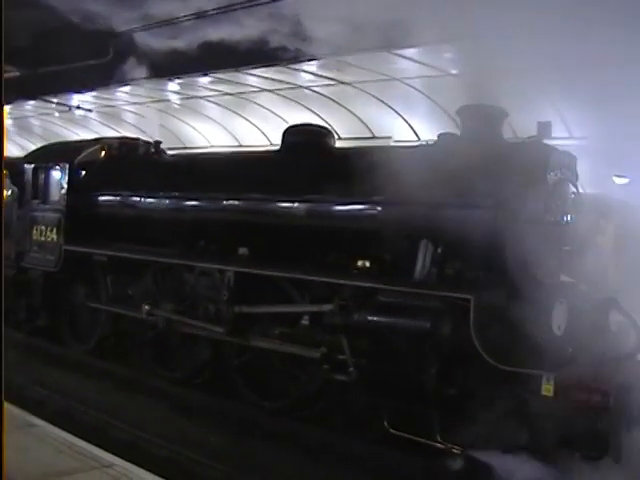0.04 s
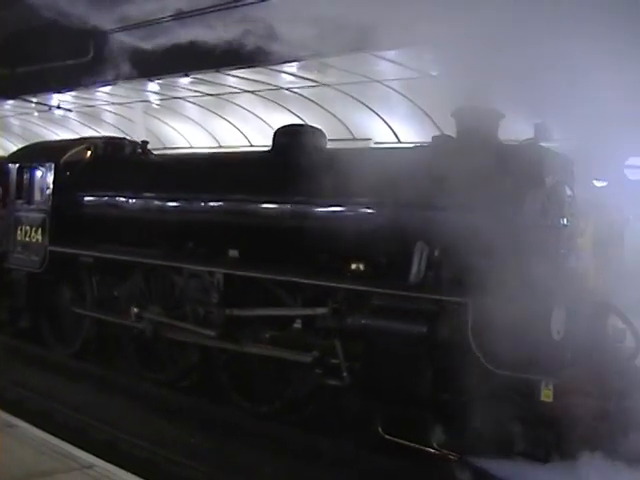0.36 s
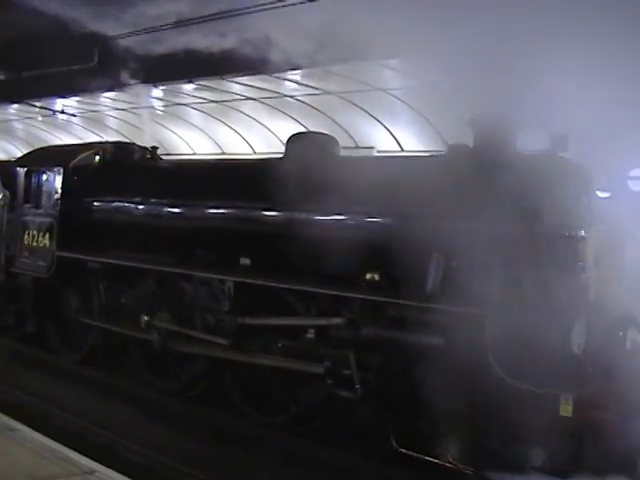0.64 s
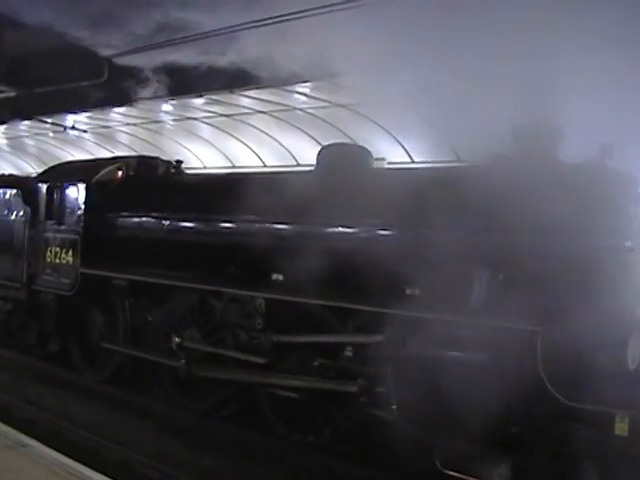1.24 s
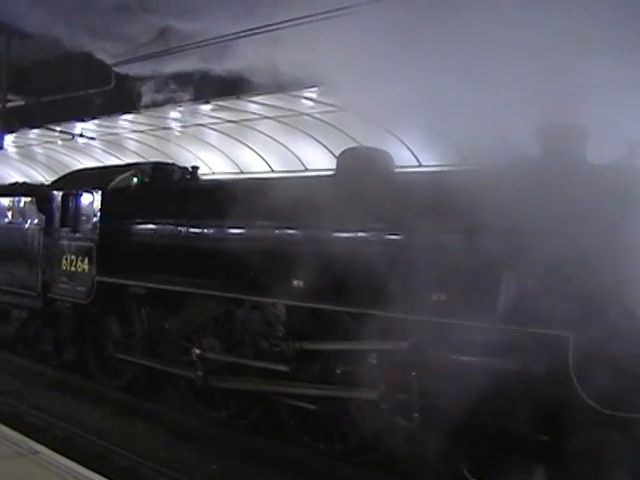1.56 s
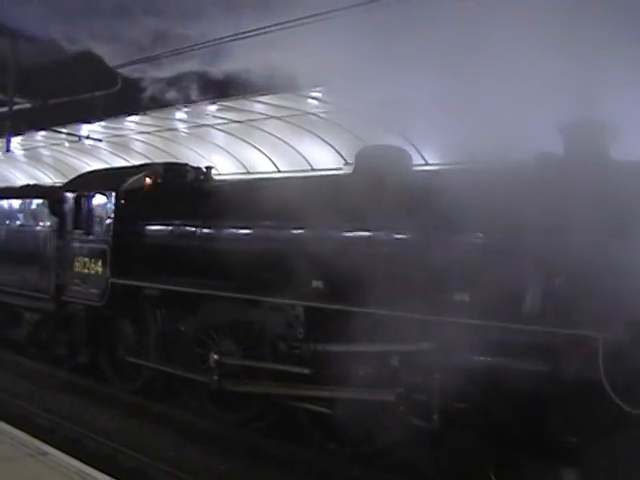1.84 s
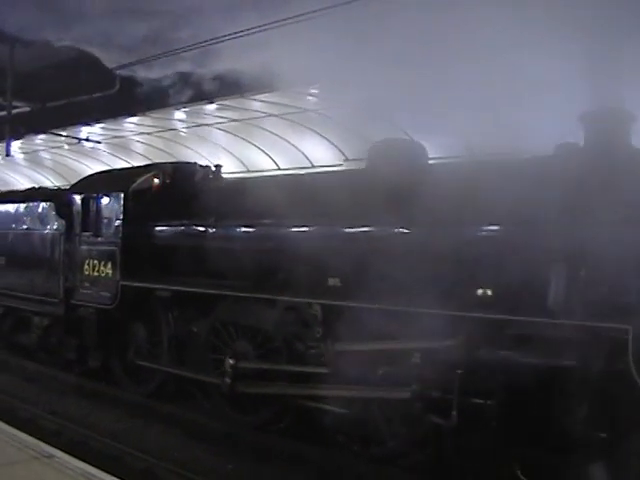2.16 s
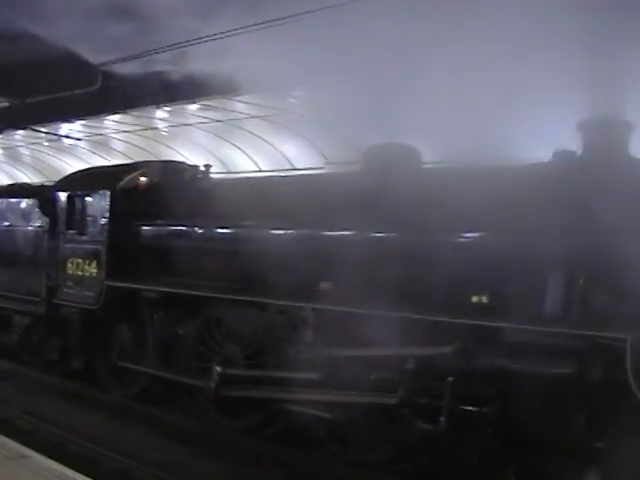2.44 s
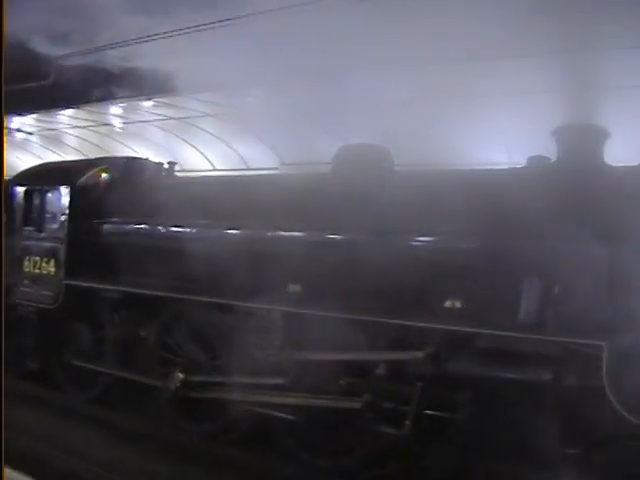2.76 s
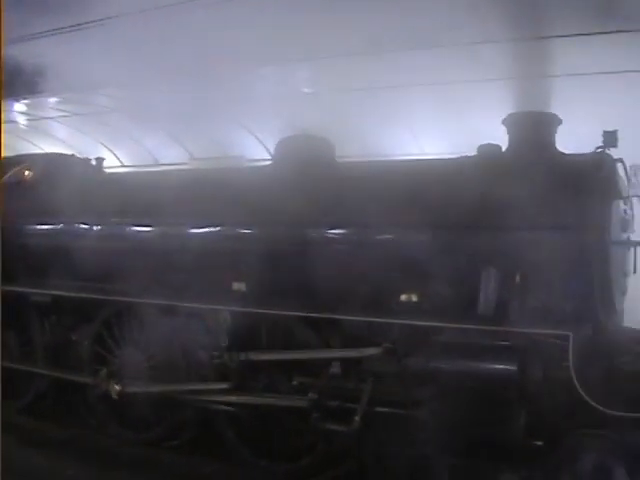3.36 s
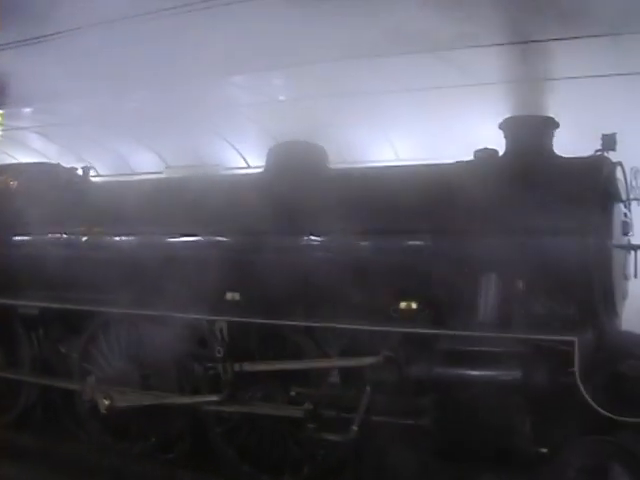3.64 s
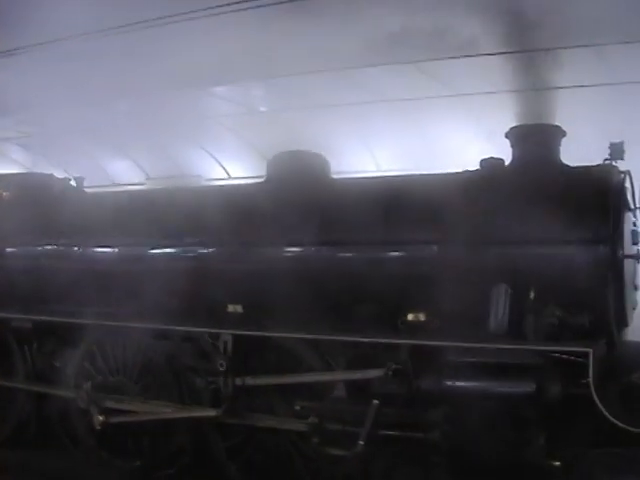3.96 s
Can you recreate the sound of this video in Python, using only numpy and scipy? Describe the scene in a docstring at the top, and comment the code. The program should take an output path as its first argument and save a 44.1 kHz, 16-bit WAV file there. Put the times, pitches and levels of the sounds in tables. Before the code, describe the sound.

Loud hiss of steam jetting from a locomotive, easing to a hollow rush near the end.

```python
"""A steam locomotive creeps past under a station roof, blowing off steam with a hollow rush.
Almost at once its cylinder drain cocks snap open and throw a fierce hiss with two shrill bands.
The hiss overloads the microphones, whose lopsided clipping adds a rough, tearing roar.
Just before 3 s the cocks shut and the jet dies away; the blow-off carries on, with brief hollow rings."""
import sys
import numpy as np
from scipy import signal
from scipy.fft import rfft, irfft
from scipy.io import wavfile
from scipy.ndimage import uniform_filter1d, map_coordinates

SR = 44100
rng = np.random.default_rng(int(sys.argv[2]) if len(sys.argv) > 2 else 0)


def dump(signal):
    """Clip the signal to [-1, 1] and save it as 16-bit WAV at the path in sys.argv[1]."""
    limited = np.clip(np.atleast_2d(signal).T, -1, 1)
    pcm = np.round(limited * 32767).astype(np.int16)
    wavfile.write(sys.argv[1], SR, pcm)


N = 176400


def amp(db):
    """Decibels to gain."""
    return 10 ** (np.asarray(db) / 20)


def at_hz(rows, hz):
    """(Hz, value) rows interpolated on a log frequency axis."""
    row_hz, values = np.transpose(rows)
    return np.interp(np.log(hz + 1), np.log(row_hz + 1), values)


def at_times(rows, time_s):
    """Each column after the first, interpolated at time_s."""
    row_s, *columns = np.transpose(rows)
    return [np.interp(time_s, row_s, column) for column in columns]


def wobble(rate_hz):
    """Smooth random curve, rate_hz knots a second."""
    return map_coordinates(rng.standard_normal(400), [np.arange(N) * rate_hz / SR], mode="wrap")


def bell(x, centre, width):
    """Gaussian of height 1."""
    return np.exp(-.5 * ((x - centre) / width) ** 2)


def turbulence(patchy_db):
    """Two independent noises with drifting patches of level, as short-time spectra."""
    hz, frame_s, spectra = signal.stft(rng.standard_normal((2, N)), SR, nperseg=1024)
    patches = uniform_filter1d(rng.standard_normal(spectra.shape[1:]), size=8, axis=0)
    patches = uniform_filter1d(patches, size=12, axis=1)
    return hz[:, None], frame_s, spectra * amp(patchy_db * patches / patches.std())


# Each row: frequency in Hz, base lag of the left microphone in radians.
LEFT_LAG = [(100, 0.33), (2900, 0), (4200, 0.49), (6300, 0.48), (8300, 0.84), (15000, 1.1)]
# Direction of the steam. Each row: time in seconds, stereo spread factor, factor on LEFT_LAG.
DIRECTION = [(0, 0.32, .5), (.3, 0.44, .45), (.57, 0.7, .55), (.63, 1, .7), (.7, 0.74, .6),
             (1.2, 1.06, .85), (1.9, 1.3, 1.3), (2.6, 1.34, 1.35), (2.9, 0.94, 1.25), (3.18, 1.05, 1.5),
             (3.28, 0.73, 1.2), (3.7, 0.71, 1.05), (4, 0.36, .65)]


def at_microphones(spectra, hz, frame_s, likeness):
    """Stereo pair of rms 1: partly alike, the left late, both set by the steam's direction."""
    spread, lag_factor = at_times(DIRECTION, frame_s)
    spread_rad = spread * np.arccos(np.clip(at_hz(likeness, hz), 0, 1)) / 2
    mid, side = spectra[0] * np.cos(spread_rad), spectra[1] * np.sin(spread_rad)
    half_lag = np.exp(.5j * lag_factor * at_hz(LEFT_LAG, hz))
    left, right = (mid + side) / half_lag, (mid - side) * half_lag
    pair = signal.istft(np.array([left, right]))[1][:, :N]
    return pair / pair.std()


# Each row: time in seconds, level in dB.
BLOW_OFF_LEVEL = [(0, -9), (.5, -5.5), (1.5, -8), (2.3, -6.6), (2.85, -6), (3.05, -7.5), (3.22, -7),
                  (3.33, -7.5), (3.5, -8.5), (3.8, -8.5), (3.91, -10), (4, -10.5)]
# Each row: frequency in Hz, relative spectral density in dB.
BLOW_OFF_SPECTRUM = [(30, -19), (130, -22), (380, -21.5), (560, -7), (1000, -3.5), (2000, -3), (2700, 0),
                     (4500, -0.9), (6800, -0.6), (8500, -4.5), (11000, -13.5), (16000, -28)]
# Each row: centre in Hz, width in Hz, lift in dB.
PIPE_RESONANCES = [(1070, 41, 3.5), (1215, 74, 2.5), (1570, 270, 2), (2680, 260, 2), (3570, 97, 1.5)]
# Each row: peak time in seconds, half length in seconds, centre in Hz, width in Hz, lift in dB.
HOLLOW_RINGS = [(.02, .06, 1260, 40, 10), (.15, .15, 1730, 110, 4), (2.3, 0.34, 1650, 60, 6),
                (3.0, .14, 1600, 120, 2.5), (3.363, .05, 1180, 30, 4), (3.68, 0.092, 1076, 35, 8.5),
                (3.766, 0.033, 1240, 45, 10.5)]
# Each row: frequency in Hz, left-right likeness from 0 to 1.
BLOW_OFF_LIKENESS = [(100, 0.91), (1000, 1), (3000, 1), (6500, 0.96), (8300, 0.78), (15000, .35)]


def blow_off():
    """Steady rush of steam, coloured by its pipe; hollow rings swell and fade."""
    hz, frame_s, noise = turbulence(patchy_db=0.58)
    pipe_db = sum(lift_db * bell(hz, centre_hz, width_hz)
                  for centre_hz, width_hz, lift_db in PIPE_RESONANCES)
    rings_db = sum(lift_db * bell(frame_s, peak_s, half_s) * bell(hz, centre_hz, width_hz)
                   for peak_s, half_s, centre_hz, width_hz, lift_db in HOLLOW_RINGS)
    colour_db = at_hz(BLOW_OFF_SPECTRUM, hz) + pipe_db + rings_db
    rush = at_microphones(noise * amp(colour_db), hz, frame_s, BLOW_OFF_LIKENESS)
    level_db, = at_times(BLOW_OFF_LEVEL, np.arange(N) / SR)
    return rush * amp(level_db + 0.59 * wobble(rate_hz=14))


# Each row: time in seconds, level in dB with the cocks open.
JET_LEVEL = [(.08, -10), (.2, -6.5), (.33, -4.5), (.5, -3.5), (.95, -0.2), (1.6, 2.5), (2.3, 1.3),
             (2.75, 2)]
# Each row: frequency in Hz, relative spectral density in dB.
JET_SPECTRUM = [(30, -25), (200, -8), (600, -6.5), (1500, -6.5), (3000, -8), (4700, -2.5), (5500, -4.5),
                (6800, -1), (8300, -5.5), (11000, -11), (16000, -13.5)]
# Two bands that drift as the engine moves.
# Each row: time in seconds, lower centre in Hz, its lift in dB, upper centre in Hz, its lift in dB.
SHRILL_BANDS = [(.1, 4100, 7.5, 5900, 3), (.5, 4000, 6, 6200, 7), (1.0, 3970, 7, 6230, 4),
                (1.5, 3950, 4, 6000, 1.5), (2.0, 3630, 4, 6500, -1), (2.5, 3480, 7, 6500, 0),
                (2.85, 3630, 8, 6350, 4)]
# Each row: frequency in Hz, share of the extra fade after shutting.
EXTRA_FADE_SHARE = [(30, 0.85), (400, 0.78), (2500, 0.074), (16000, 0)]
# Each row: frequency in Hz, left-right likeness from 0 to 1.
JET_LIKENESS = [(100, 0.42), (1500, 0.82), (3500, 1), (6500, 0.97), (8300, 0.73), (15000, 0.47)]


def drain_cocks():
    """Shrill steam jet: snaps on with a bright edge; as the cocks shut, the low rush dies first."""
    open_s, opening_s, shut_s = 0.065, .012, 2.74
    fade_db_per_s, extra_fade_db_per_s = 41, 57
    edge_hz, edge_lift_db, edge_decay_s = 4820, 10.5, 0.3
    hz, frame_s, noise = turbulence(patchy_db=0.94)
    lower_hz, lower_db, upper_hz, upper_db = at_times(SHRILL_BANDS, frame_s)
    shrill_db = lower_db * bell(hz, lower_hz, width=170) + upper_db * bell(hz, upper_hz, width=230)
    edge_decay = np.exp(-np.maximum(frame_s - open_s, 0) / edge_decay_s)
    edge_db = edge_lift_db * bell(hz, edge_hz, width=150) * edge_decay
    thinning_db = extra_fade_db_per_s * at_hz(EXTRA_FADE_SHARE, hz) * np.maximum(frame_s - shut_s, 0)
    colour_db = at_hz(JET_SPECTRUM, hz) + shrill_db + edge_db - thinning_db
    hiss = at_microphones(noise * amp(colour_db), hz, frame_s, JET_LIKENESS)
    time_s = np.arange(N) / SR
    opening = np.clip((time_s - open_s) / opening_s, 0, 1)
    closing = amp(-fade_db_per_s * np.maximum(time_s - shut_s, 0))
    level_db, = at_times(JET_LEVEL, time_s)
    return hiss * opening * closing * amp(level_db + 0.19 * wobble(rate_hz=9.2))


def scene():
    """Both steam sources summed in stereo."""
    return blow_off() + drain_cocks()


# Each row: frequency in Hz, gain in dB after the overload.
RECORDER_TONE = [(20, -25), (60, -6.5), (150, 0), (300, 2), (1000, -0.5), (4000, 0.5), (8000, 0.5),
                 (12000, -.5), (16000, -2)]


def record(dry):
    """Microphones clip off centre, more so when loud; the recorder filters; the level wavers slightly."""
    headroom, hardness = .47, 2.2
    rest_bias, bias_per_rms = .1, 0.15
    low_hz, top_hz, lag_at_10khz_rad = 12, 15800, 0.6
    rms = np.sqrt(np.abs(uniform_filter1d(dry ** 2, size=900, axis=1)))
    biased = signal.resample(dry - rest_bias - bias_per_rms * rms, 2 * N, axis=1)  # 2x oversampled
    clipped = biased / (1 + np.abs(biased / headroom) ** hardness) ** (1 / hardness)
    hz = np.fft.rfftfreq(2 * N, .5 / SR)
    tone = amp(at_hz(RECORDER_TONE, hz)) * np.exp(-1j * lag_at_10khz_rad * (hz / 10000) ** 3)
    passband = (hz > low_hz) & (hz < top_hz)
    filtered = irfft(rfft(clipped) * tone * passband)[:, ::2]
    return filtered * amp(0.11 * wobble(rate_hz=16))


dry = scene()
out = record(dry)
dump(out)
```